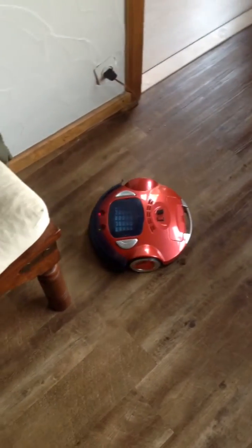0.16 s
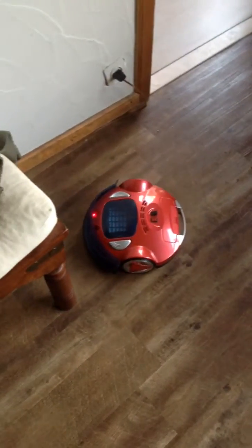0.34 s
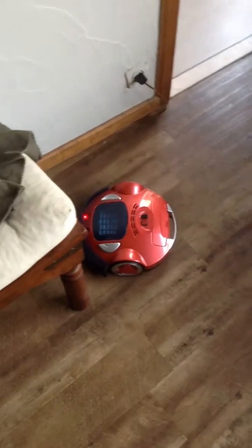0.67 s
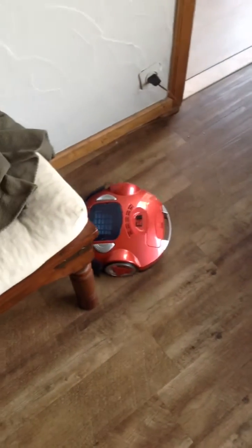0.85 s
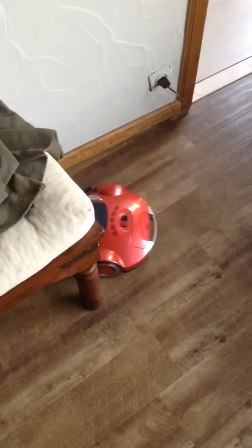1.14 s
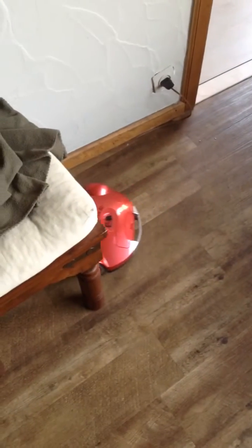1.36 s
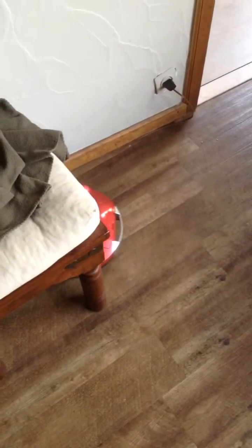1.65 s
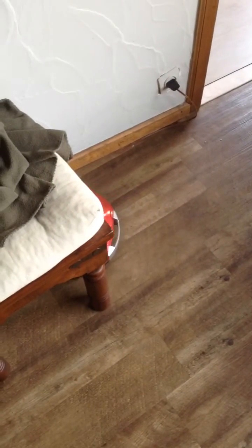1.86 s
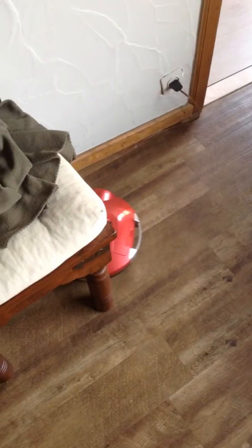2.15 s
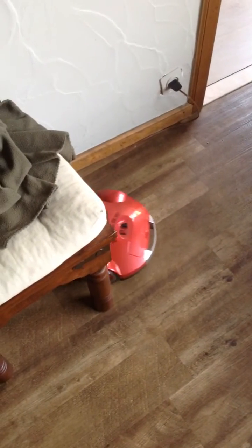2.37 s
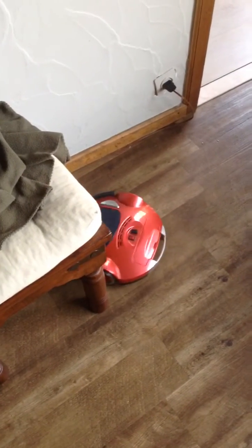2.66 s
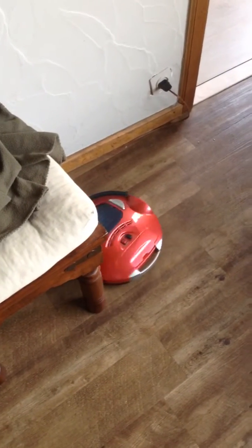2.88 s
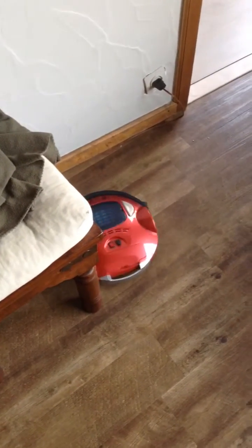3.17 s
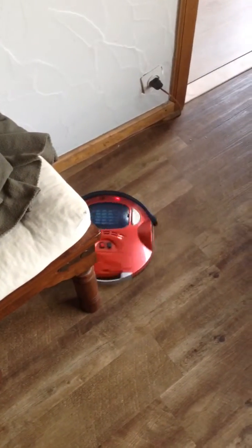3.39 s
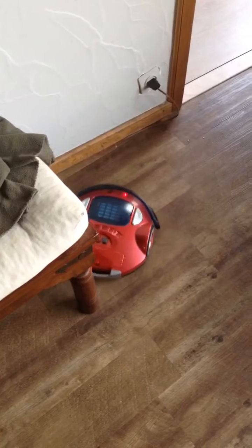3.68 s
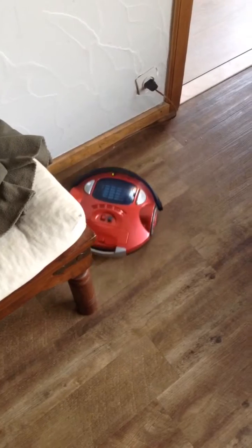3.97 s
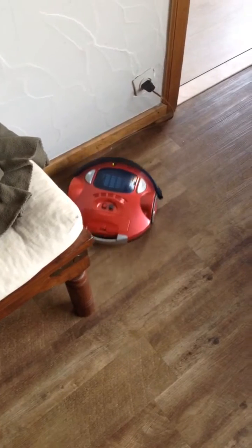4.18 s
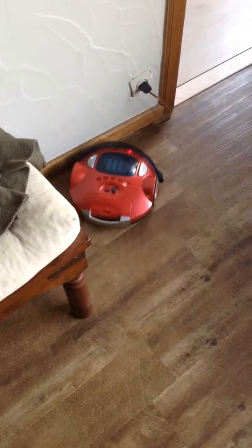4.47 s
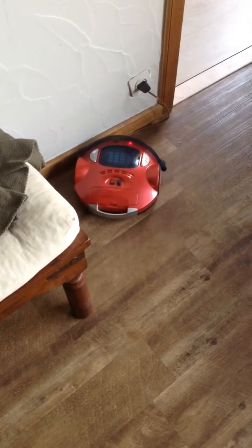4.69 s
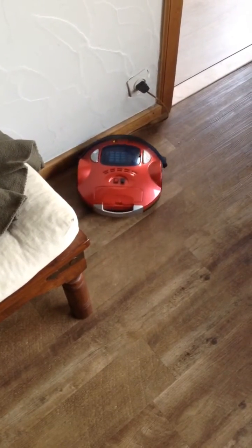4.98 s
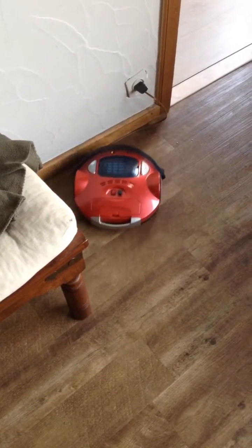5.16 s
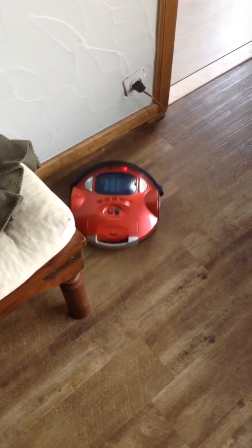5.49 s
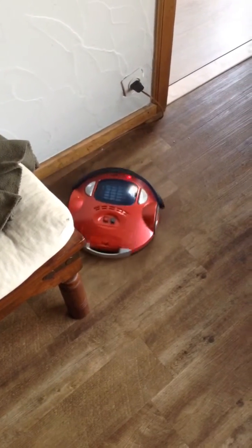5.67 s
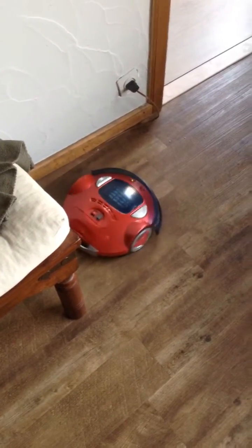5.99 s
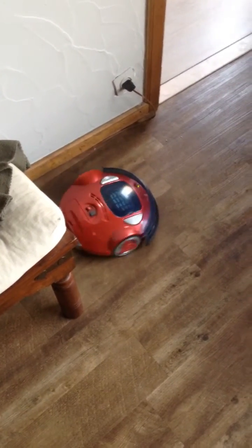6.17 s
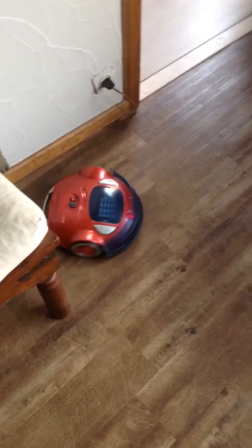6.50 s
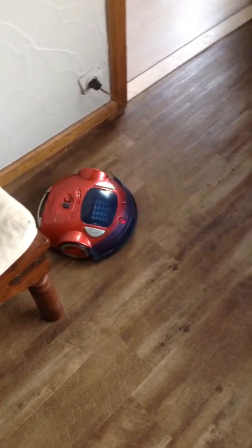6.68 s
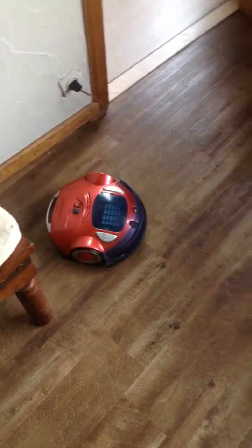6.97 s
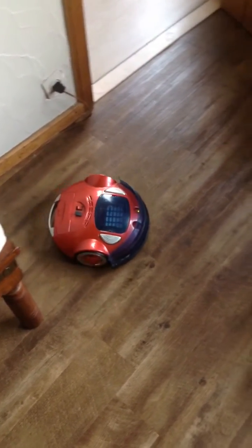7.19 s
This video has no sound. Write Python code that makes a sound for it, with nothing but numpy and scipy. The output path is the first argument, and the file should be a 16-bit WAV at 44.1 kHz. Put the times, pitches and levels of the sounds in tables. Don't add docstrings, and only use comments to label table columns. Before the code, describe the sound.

Steady high fan-motor whine and airy hiss of a robot vacuum on floorboards, with gear hum, dull knocks and faint late brush squeaks.

```python
import sys
import numpy as np
from scipy import signal
from scipy.fft import rfft, irfft, next_fast_len
from scipy.io import wavfile
from scipy.ndimage import uniform_filter1d

SR = 44100
rng = np.random.default_rng(int(sys.argv[2]) if len(sys.argv) > 2 else 0)


def volts(x):
    e = np.asarray(x, float) / 20
    return 10 ** e


def dump(signal):
    limited = np.clip(np.atleast_2d(signal).T, -1, 1)
    pcm = np.round(limited * 32767).astype(np.int16)
    wavfile.write(sys.argv[1], SR, pcm)


N = 323694
T = np.arange(N) / SR
KNOT_HZ = 400
SWELL_EDGE_S = 0.073


def unit(x):
    return x / np.sqrt(np.mean(np.abs(x) ** 2))


def knots(rate_hz):
    v = rng.standard_normal(int(KNOT_HZ * N / SR) + 2)
    v = uniform_filter1d(v, max(int(KNOT_HZ / rate_hz), 1))
    v = uniform_filter1d(v, max(int(KNOT_HZ / 2 / rate_hz), 1))
    return unit(v - v.mean())


def spread(v):
    return np.interp(T, np.arange(len(v)) / KNOT_HZ, v)


def walk(rate_hz):
    return spread(knots(rate_hz))


def gate(start_s, length_s, edge_s, t=T):
    rise = 1 + np.tanh((t - start_s) / edge_s)
    fall = 1 - np.tanh((t - start_s - length_s) / edge_s)
    return rise * fall / 4


def curves(table):
    s, *columns = np.transpose(table)
    return [np.interp(T, s, column) for column in columns]


def narrow_noise(hz, width_hz):
    sos = signal.butter(2, [hz - width_hz / 2, hz + width_hz / 2], "bandpass", fs=SR, output="sos")
    return unit(signal.sosfilt(sos, rng.standard_normal(N)))


def patchy_noise(colour, slow_db, quick_db, tilt_db=0., ducts=(), count=24):
    size = next_fast_len(N)
    hz = np.maximum(np.arange(size // 2 + 1) * SR / size, 1)
    log_hz, edge, db = np.log(hz), np.log(np.array(colour)[:, 0]), np.array(colour)[:, 1]
    shape_db = np.interp(log_hz, edge, db, -120, -120)
    for duct_hz, half_width_hz, gain_db in ducts:
        shape_db += gain_db * np.exp(-((hz - duct_hz) / half_width_hz) ** 2)
    coloured = irfft(rfft(rng.standard_normal(size)) * volts(shape_db), size)
    spectrum = rfft(unit(coloured))
    place = (log_hz - edge[0]) / (edge[-1] - edge[0]) * (count - 1)
    out, shared = np.zeros(N), knots(14)
    for k in range(count):
        band = irfft(spectrum * np.clip(1 - abs(place - k), 0, 1), size)[:N]
        high = np.clip((k / (count - 1) - .68) / .1, 0, 1)
        slow = slow_db * (1 - 2.0 * high) * knots(0.55)
        quick = quick_db * (knots(4.5) + 0.49 * high * shared)
        lift = volts(high * tilt_db) if high else 1
        out += band * spread(volts(slow + quick)) * lift
    return out


# multiple of the shaft rate, level_db [dB]
MOTOR_ORDERS = [(2, -17), (8, -12.5), (9, -14.5), (11, -16.5), (12, -10.5), (13, -15), (14, -11),
                (15, -17.5), (16, -17), (17, -13), (18, -12.5), (19, -16), (20, -15), (21, -20.5),
                (23, -24), (24, -20), (25, -20.5), (28, -20.5), (29, -23), (30, -20), (31, -23.5),
                (58, -34)]
# multiple, level_db [dB]
SHELL_ORDERS = [(1, -52), (3, -40), (4, -50.5), (5, -49.5), (6, -39), (7, -66), (10, -52)]
# start_s [s], length_s [s], multiple,
# level_db [dB]
ECHO_SWELLS = [(-0.11, 1.25, 5, -47), (-0.0, 0.46, 6, -38.5), (0.062, 2.3, 7, -35), (0.23, 1.7, 7, -38),
               (0.8, 2.08, 6, -37.5), (1.28, 0.35, 5, -42), (2.0, 0.26, 3, -37), (2.06, 0.026, 6, -26.5),
               (2.394, 0.61, 7, -33.5), (2.54, 0.26, 3, -42), (2.62, 0.25, 7, -42), (2.67, 2.16, 5, -42),
               (3.303, 0.31, 7, -37.7), (3.33, 0.35, 6, -37.5), (3.634, 0.67, 3, -35.0),
               (3.67, 0.46, 7, -33.5), (3.92, 0.26, 6, -34.5), (4.22, 0.7, 7, -40.9), (4.85, 0.29, 6, -43),
               (4.915, 1.14, 3, -33.5), (5.0, 0.3, 5, -47.0), (5.007, 0.31, 3, -36),
               (5.058, 0.14, 7, -22.5), (5.267, 1.16, 7, -33.5), (5.74, 0.94, 5, -37),
               (5.82, 0.66, 6, -29.5), (5.83, 0.37, 7, -38.5), (6.47, 0.59, 6, -42), (6.7, 0.9, 7, -36.5),
               (6.808, 0.8, 3, -33.5),
               (-0.3, 0.81, 9, -44), (0.05, 1.29, 10, -44.5), (0.28, 3.3, 4, -44), (0.3, 0.29, 10, -41),
                (0.61, 0.13, 8, -39), (0.63, 1.05, 4, -44.5), (1.29, 1.32, 1, -43), (2.13, 0.6, 9, -52),
                (2.25, 1.2, 10, -48.1), (2.278, 0.055, 4, -38), (2.58, 0.87, 8, -40.5),
                (2.59, 0.62, 4, -46), (2.68, 0.43, 1, -47), (3.06, 1.8, 8, -52.2), (3.32, 0.57, 10, -40.0),
                (3.67, 1.33, 1, -46), (3.87, 0.52, 9, -44), (4.23, 1.02, 10, -43.5), (4.53, 0.37, 8, -45),
                (5.06, 0.14, 4, -39.4), (5.15, 0.69, 1, -46.9), (5.39, 1.1, 9, -47.5),
                (5.402, 0.29, 10, -44), (5.52, 0.38, 8, -45), (5.8, 0.84, 4, -39.2),
                (5.902, 0.47, 10, -40.5), (6.0, 1.5, 1, -46), (6.67, 0.06, 8, -31.5), (6.75, 0.73, 10, -39),
                (7.08, 0.52, 4, -39),
               (-0.3, 0.74, 20, -45), (0.18, 0.96, 13, -47.5), (0.57, 0.44, 12, -44.1),
                (0.66, 0.079, 15, -36), (1.12, 0.055, 15, -39.3), (1.25, 1.3, 20, -48.5),
                (1.28, 0.27, 16, -42), (1.89, 0.3, 13, -44), (1.89, 0.43, 18, -48), (2.17, 2.6, 19, -52),
                (2.95, 0.25, 15, -50), (3.08, 0.34, 16, -48.9), (3.22, 0.36, 17, -50),
                (3.25, 0.052, 19, -40), (4.09, 0.057, 12, -30), (4.17, 0.35, 13, -51),
                (4.3, 0.41, 20, -46.0), (4.76, 0.46, 13, -39), (4.83, 0.3, 12, -44.0), (4.83, 2, 12, -50),
                (5.011, 2.19, 18, -60), (5.13, 2.47, 15, -50), (5.29, 0.39, 13, -48.2),
                (5.52, 0.59, 16, -54), (5.85, 0.21, 19, -44), (5.9, 0.27, 18, -52), (6.04, 0.11, 17, -39),
                (6.14, 0.35, 14, -45.7), (6.61, 0.64, 19, -45), (6.84, 0.34, 16, -48)]


def motor_whine(turns, shade_db):
    out, shell = np.zeros(N), {round(k): db for k, db in SHELL_ORDERS}
    swells = ECHO_SWELLS
    t = np.arange(len(knots(1))) / KNOT_HZ
    shade = np.interp(t, T, shade_db)
    shaft, tone = np.exp(2j * np.pi * turns), np.sqrt(2)
    for k in range(1, 59):
        echoes = knots(1.5 + 0.16 * k) + 1j * knots(1.34 + 0.32 * k)
        flutter = knots(30) + 1j * knots(30)
        tone = tone * shaft
        steady = 1 + .009 * k * echoes + (.03 + .005 * k) * flutter
        swell = sum(volts(db + 0.3) * gate(s, length, SWELL_EDGE_S, t)
                    for s, length, order, db in swells if round(order) == k)
        gain = steady * swell
        if k in shell:
            gain = gain + volts(shell[k]) * steady
        else:
            db = -33.5 + np.interp(k, *np.transpose(np.round(MOTOR_ORDERS))) + (k > 20) * shade
            echo_share = .6 if k > 20 else .35
            faded = .99 - echo_share + echo_share * echoes + (0.12 + 0.0085 * k) * flutter
            gain = gain + volts(db) * faded
        start_phase = np.exp(2j * np.pi * rng.random())
        out += np.real(spread(gain * start_phase) * tone)
    return out


# start_s [s], length_s [s], gain_db [dB]
MOUTH_OPEN = [
    (2.6, 1.1, 1),
    (4.08, 0.15, 3),
    (4.55, 0.59, 5.5),
]


def mouth_facing():
    return sum(db * gate(s, length, SWELL_EDGE_S) for s, length, db in MOUTH_OPEN)


# frequency_hz [Hz], density_db [dB per Hz]
AIR_COLOUR = [(250, -53), (430, -12.5), (694, -9.5), (760, -12.5), (831, -5.5), (1360, -5), (1510, -4.5),
              (2170, -11), (3100, -11.5), (7620, -20), (13100, -25), (15400, -31)]
# frequency_hz [Hz], half_width_hz [Hz], gain_db [dB]
DUCTS = [(3870, 480, -2.5), (4500, 610, 4), (5250, 340, -3.5), (7630, 1120, 4.5)]


def air_hiss(turns, shade_db, facing_db):
    follows = 0.46
    hiss = patchy_noise(AIR_COLOUR, slow_db=1.5, quick_db=.5, tilt_db=(1 - follows) * shade_db, ducts=DUCTS)
    throb = 1 + .04 * np.cos(2 * np.pi * turns) + .04 * np.cos(2 * np.pi * 2 * turns)
    level_db = -35.5 + follows * shade_db + 0.095 * facing_db + 5.5
    return volts(level_db) * throb * hiss


def mouth_rush(shade_db, facing_db):
    level_db = -41.5 - 1.5 + facing_db + 0.8 * shade_db + 0.5 * walk(3.1)
    return volts(level_db) * narrow_noise(hz=3128, width_hz=390)


# frequency_hz [Hz], density_db [dB per Hz]
BOARDS = [(35, -85), (60, -59), (102, -32), (183, -16), (231, -5.5), (254, -4.5), (275, 3), (339, -3),
          (400, -0.5), (452, -16), (480, -21), (620, -16.5), (1060, -120)]
# start_s [s], length_s [s]
HALTS = [
    (.86, 0.14),
    (1.747, 0.063),
    (2.256, .08),
    (3.833, .12),
    (4.8, .14),
    (5.36, .12),
    (5.854, 0.16),
    (7.105, .4),
]


def wheels(load_db):
    rumble = volts(load_db - 1.5) * patchy_noise(BOARDS, slow_db=0.8, quick_db=0.6, count=8)
    mesh_hz = 396 + 3 * walk(2.36)
    lumps = 1 + 0.21 * (walk(22) + 1j * walk(17))
    mesh = lumps * np.exp(2j * np.pi * np.cumsum(mesh_hz) / SR)
    halted = sum(gate(s, length, edge_s=0.044) for s, length in HALTS)
    gear_db = load_db - 3.5 + 1.5 * walk(5) - 19 * halted
    return rumble + volts(gear_db) * np.real(mesh)


def ring(start_s, hz, level_db, t60_s, soft_s=0.0037):
    out, start = np.zeros(N), int(start_s * SR)
    t = T[:min(SR // 2, N - start)]
    decay = (1 - np.exp(-t / soft_s)) * np.exp(-np.log(1000) * t / max(t60_s, .01))
    out[start:start + len(t)] = volts(level_db) * decay * np.sin(2 * np.pi * hz * t)
    return out


# start_s [s], peak_db [dB], pitch_hz [Hz], thump_db [dB]
KNOCKS = [(1.086, -26, 390, -69), (1.214, -25, 301, -73), (1.67, -17, 394, -79), (1.745, -24, 266, -62),
          (1.77, -18, 257, -45), (1.809, -21, 248, -41), (1.859, -22.5, 272, -52), (2.151, -33, 273, -68),
          (2.375, -24, 396, -69), (2.658, -29, 266, -67), (2.916, -24, 342, -82), (3.734, -22, 270, -71),
          (4.608, -30, 393, -68), (4.75, -26, 268, -92), (4.929, -21, 275, -80), (5.004, -21, 277, -75),
          (5.043, -17.5, 310, -72), (5.1, -26, 350, -66), (6.101, -31, 393, -71), (6.168, -20, 280, -74),
          (6.406, -25, 265.9, -74), (6.807, -26, 264, -88)]


def knocks():
    out = ring(2.59, 685, -28, t60_s=.13, soft_s=0.0031)
    for s, db, hz, thump_db in KNOCKS:
        out += ring(s, hz, db - 2.5, t60_s=0.077)
        out += ring(s, 120, thump_db + 8, t60_s=.12, soft_s=.004)
    return out


def wall_rush():
    return volts(-41.5) * gate(4.3, 1.3, 2 * SWELL_EDGE_S) * narrow_noise(hz=1120, width_hz=400)


# start_s [s], length_s [s], level_db [dB]
SQUEAKS = [
    (6.095, .04, -42),
    (6.21, .05, -48),
    (6.385, .14, -44),
    (6.615, .06, -44),
]


def brush_squeak():
    slips = sum(volts(db) * gate(s, length, edge_s=0.013) for s, length, db in SQUEAKS)
    return slips * volts(2.1 * walk(60)) * narrow_noise(hz=11500, width_hz=700)


# time_s [s], shaft_hz [Hz]
SHAFT = [(0, 255.5), (1.85, 255.2), (2.02, 253.5), (2.42, 256.6), (2.53, 256.5), (2.66, 254.9),
         (3.53, 255.3), (3.7, 253.5), (3.85, 253.8), (4.27, 255.9), (4.7, 256.1), (5.07, 252.2),
         (5.5, 254.7), (5.72, 253.3), (6.1, 255), (6.55, 255), (6.85, 253.3), (7.34, 255.4)]
# time_s [s], outlet_db [dB], load_db [dB]
DRIVE = [(0, -36.5, -39), (.42, -35.5, -41), (.8, -36, -38), (1.05, -36.8, -39.5), (1.4, -39, -37.5),
         (1.76, -40, -37), (2.1, -39.5, -35), (2.45, -38, -37), (3, -38, -37.5), (3.6, -37.5, -37),
         (3.74, -39.5, -38.5), (3.9, -37.5, -39.5), (4.55, -36.5, -34.5), (5.1, -36.5, -34.5),
         (5.5, -36.5, -37.5), (5.97, -35.5, -38.5), (6.45, -35.5, -37), (7.34, -37, -42.5)]


def scene():
    outlet_db, load_db = curves(DRIVE)
    shade_db = outlet_db - outlet_db.mean()
    shaft_hz = curves(SHAFT)[0] + 0.091 * walk(25)
    turns = np.cumsum(shaft_hz) / SR
    facing_db = mouth_facing()
    mono = motor_whine(turns, shade_db)
    mono += air_hiss(turns, shade_db, facing_db) + mouth_rush(shade_db, facing_db)
    mono += wheels(load_db) + knocks() + wall_rush() + brush_squeak()
    return np.array([mono, mono])


def side_patches(mono, size=2048, count=34):
    side, window = np.zeros(N), np.sin(np.pi * (np.arange(size) + .5) / size)
    khz = np.arange(size // 2 + 1) * SR / size / 1000
    from_s, low_khz, high_khz, width_khz = 2.3, 4.3, 13, 1.6
    for when, where, wide in rng.random((count, 3)):
        s = from_s + when * (N / SR - from_s - .1)
        low = low_khz + where ** .7 * (high_khz - low_khz)
        centre = 768 + 1024 * round((s * SR - 768) / 1024)
        frame = slice(centre - size // 2, centre + size // 2)
        band = (khz > low) & (khz < low + width_khz * (.5 + wide))
        level = abs(rfft(mono[frame] * window)) * band
        phases = np.exp(2j * np.pi * rng.random(len(khz)))
        side[frame] += volts(-.5) * window * irfft(level * phases, size)
    return side


def roll_off(x):
    return signal.sosfilt(signal.butter(12, 15480, fs=SR, output="sos"), x)


def record(dry):
    bass_cut = signal.butter(4, 133, "highpass", fs=SR, output="sos")
    top_cut = signal.ellip(10, .3, 70, 15320, fs=SR, output="sos")
    thin = signal.sosfilt(top_cut, signal.sosfilt(bass_cut, dry))
    wide = thin + np.array([[1], [-1]]) * side_patches(thin[0])
    return roll_off(wide)


dry = scene()
out = record(dry)
dump(out)
```